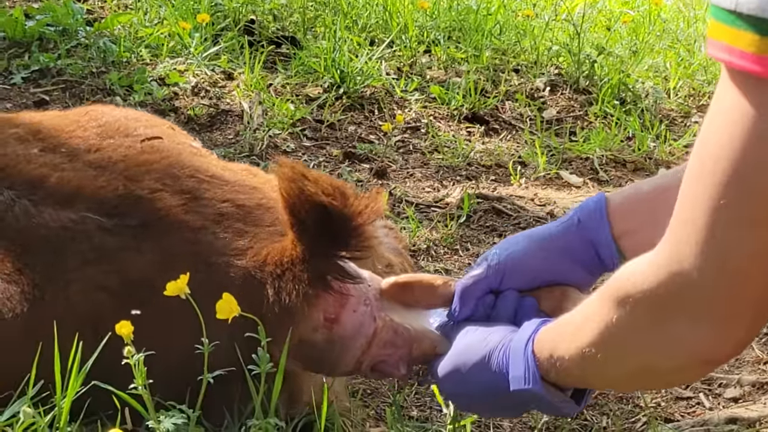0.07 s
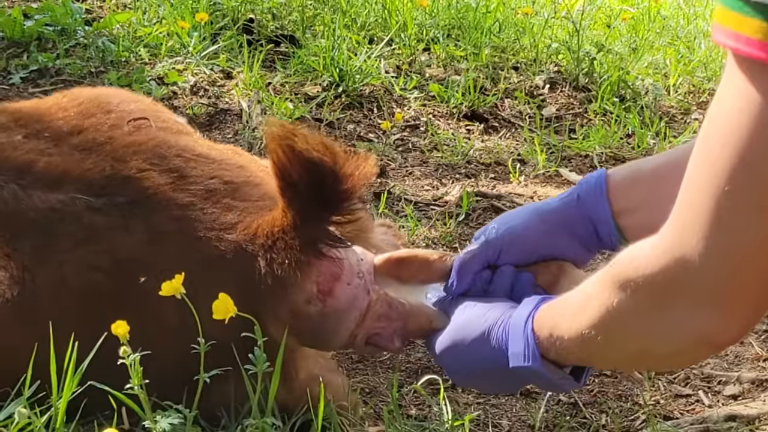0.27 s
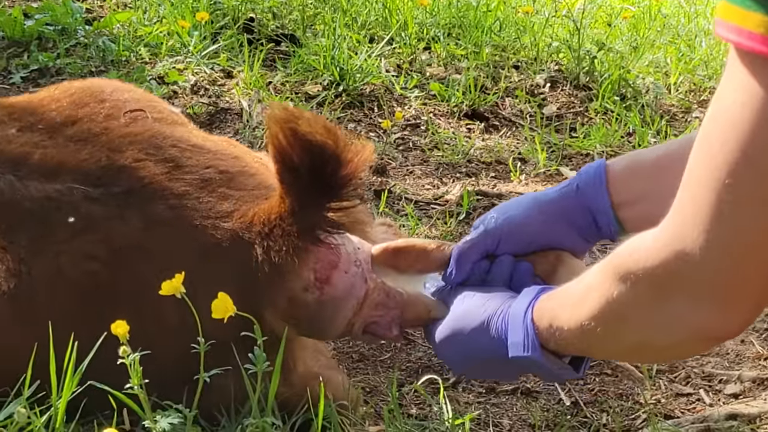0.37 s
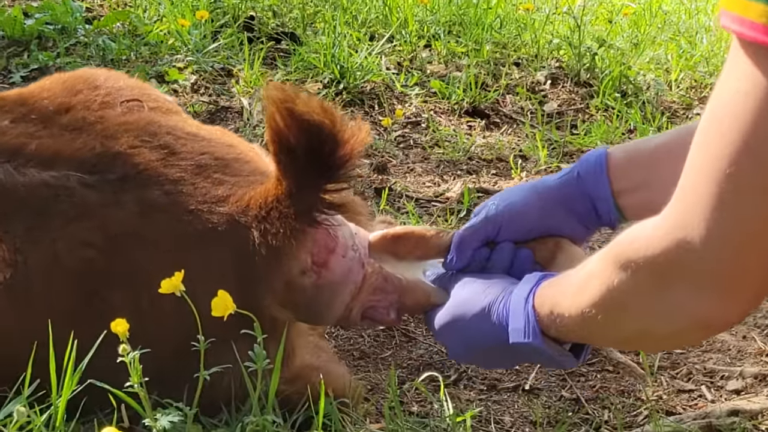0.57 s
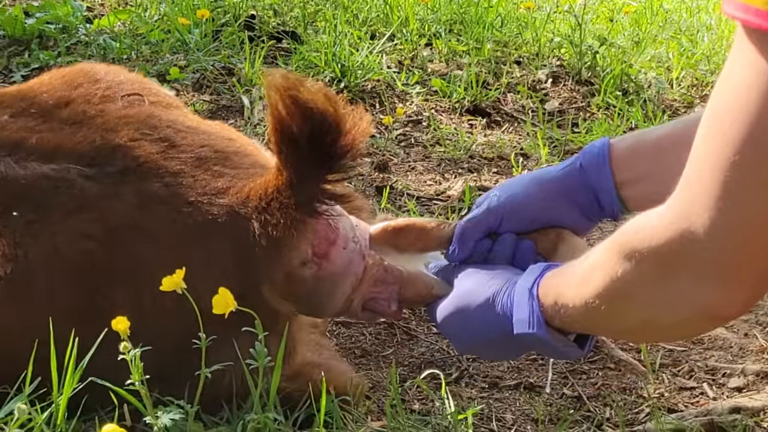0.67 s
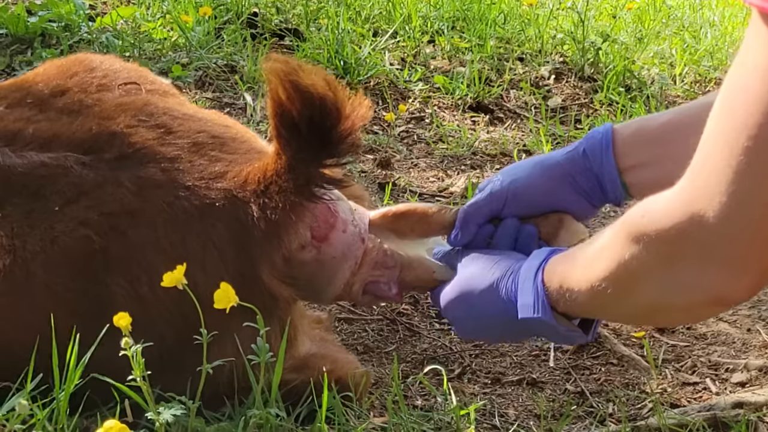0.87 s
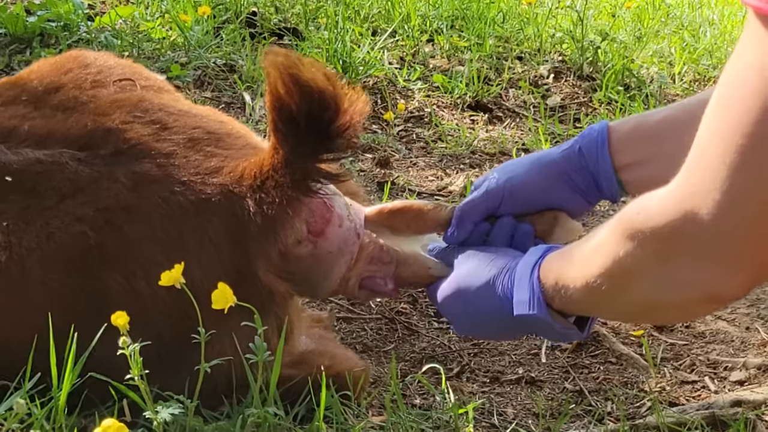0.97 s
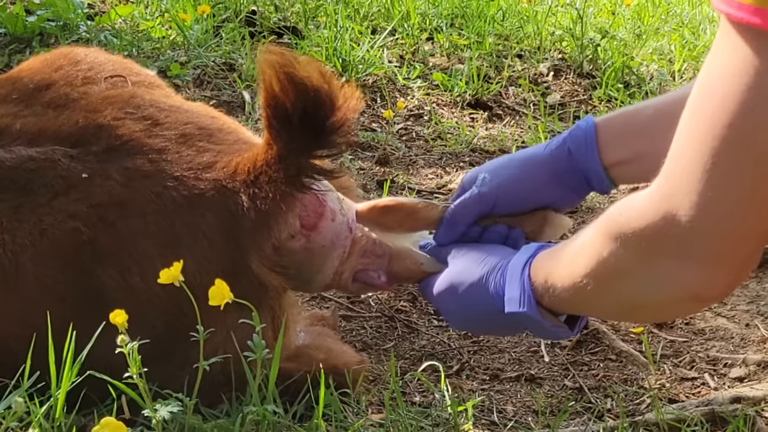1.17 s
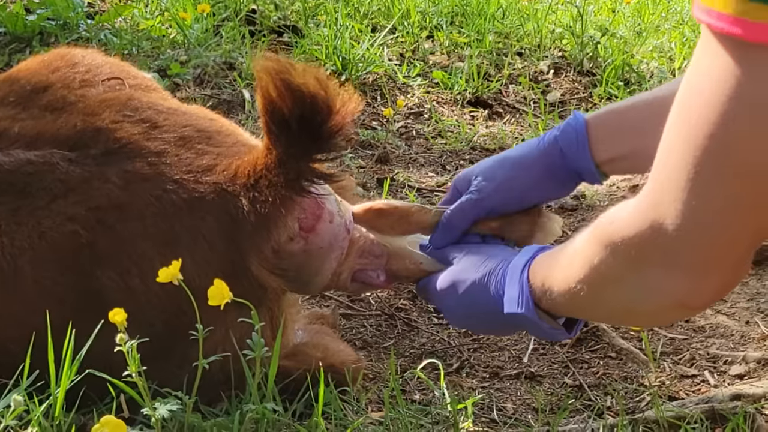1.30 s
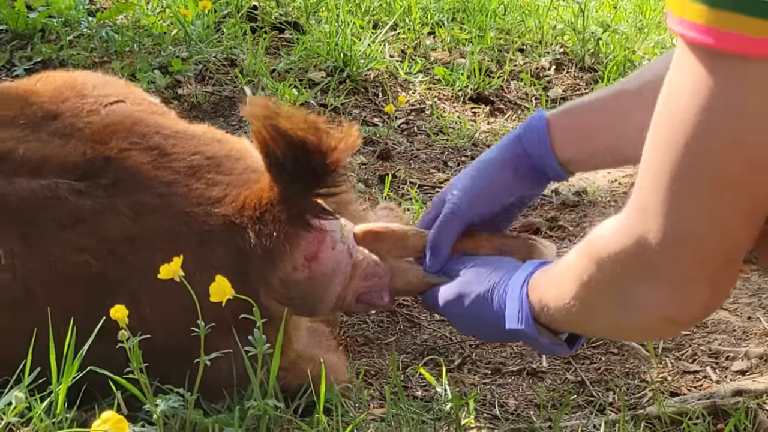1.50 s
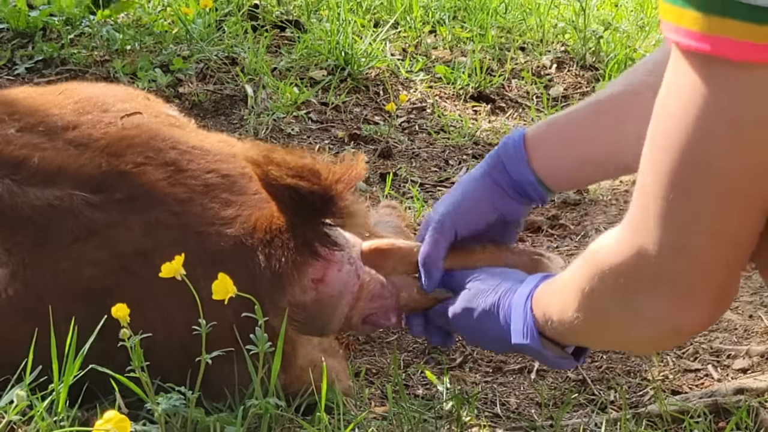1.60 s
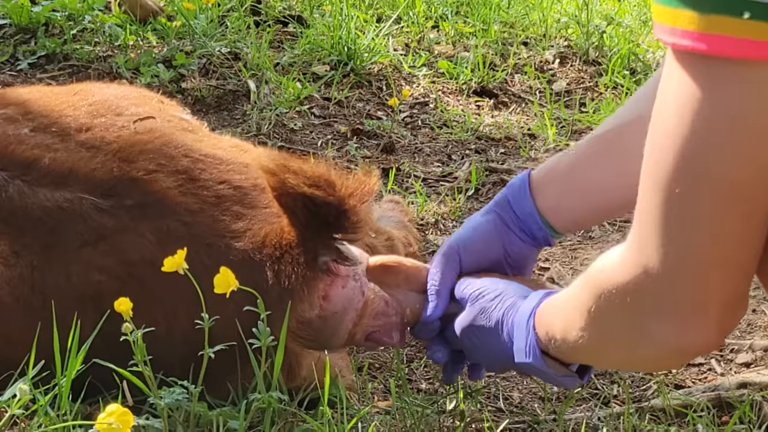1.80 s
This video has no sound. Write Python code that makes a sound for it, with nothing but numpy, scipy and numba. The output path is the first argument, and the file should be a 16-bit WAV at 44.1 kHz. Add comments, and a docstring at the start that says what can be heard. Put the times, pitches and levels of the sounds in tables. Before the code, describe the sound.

One loud, rasping goat bleat, heard outdoors, starts as a moan, rises to a high cry and breaks into a rough scream. A faint rustle and a few ticks of gloves follow against a quiet background.

```python
"""One long strained bleat from a goat in labour, lying on open ground.
A grunt and a low moan climb into a rasp, clear to a high cry, break into a harsh scream over a
lower growl, and sink to a groan. Each register is a train of vocal-fold pulses and breath, shaped
by the throat and a moving mouth. Gloved hands rustle faintly afterwards, over quiet outdoor air
with a far low hum."""
import sys
import numpy as np
from scipy.fft import rfft, irfft, next_fast_len
from scipy.io import wavfile
from scipy.ndimage import uniform_filter1d, minimum_filter1d
from numba import njit

SR = 44100
rng = np.random.default_rng(int(sys.argv[2]) if len(sys.argv) > 2 else 0)


def to_wav(s):
    """Save 16-bit WAV."""
    ch = np.atleast_2d(s).T  # columns
    pcm = np.round(np.clip(ch, -1, 1) * 32767)  # PCM
    wavfile.write(sys.argv[1], SR, pcm.astype(np.int16))


N = 81585
T = np.arange(N) / SR
SIZE = next_fast_len(N + SR // 2, True) // 2 * 2
HZ = np.maximum(np.arange(SIZE // 2 + 1) * SR / SIZE, 1)

# Vibrations of the vocal folds. Each row: time in seconds, rate in Hz.
PITCH = [(.13, 270.7), (.155, 289), (.187, 297.9), (.224, 335), (.25, 293.7), (.28, 291.9), (.298, 306.6),
         (.314, 351.3), (.34, 453), (.38, 449.5), (.41, 457), (.47, 439.6), (.508, 449.5), (.535, 439.3),
         (.585, 448.3), (.625, 454.4), (.672, 460.5), (.71, 490.5), (.74, 482.1), (.765, 412), (.84, 419.7),
         (.885, 443.8), (.94, 429.9), (1.0, 414.9), (1.08, 423.8), (1.18, 435.8)]  # the main voice
LOW_PITCH = [(.65, 228.3), (.72, 246.9), (.77, 262.9), (.86, 263.4), (.95, 249.6), (1.1, 244.8),
             (1.19, 244.9), (1.215, 242.3), (1.24, 229.8), (1.268, 230.9), (1.282, 341.5), (1.33, 343.2)]  # a second, lower vibration that takes over at the end
CREAK_PITCH = [(.06, 120.5), (.1, 125.7), (.14, 139.4), (.33, 150.3), (.38, 150.2), (.395, 118.1),
               (.47, 117.9), (.75, 133.9), (.88, 75.6), (1.0, 102.2), (1.18, 104.2)]  # the slow beat when they creak or scream


def from_db(db):
    """Decibels to gain."""
    return 10 ** (np.asarray(db) / 20)


def rms_one(x):
    """Scale to unit power."""
    return x / np.sqrt(np.mean(x ** 2) + 1e-20)


def in_time(rows):
    """A curve at every sample."""
    return np.interp(T, *np.transpose(rows))


def envelope(rows):
    """Gain of a level curve, silent outside it."""
    return from_db(np.interp(T, *np.transpose(rows), left=-120, right=-120))


def at_hz(points):
    """A spectrum table at every frequency."""
    hz, value = np.transpose(points)
    return np.interp(np.log(HZ), np.log(hz), value)


def filtered(x, response):
    """Apply a frequency response."""
    return irfft(rfft(x, SIZE) * response, SIZE)[..., :N]


def colour(x, points):
    """Causal (minimum-phase) EQ with the given curve."""
    cepstrum = irfft(np.log(from_db(at_hz(points))), SIZE)
    cepstrum[1:SIZE // 2] *= 2
    cepstrum[SIZE // 2 + 1:] = 0
    return filtered(x, np.exp(rfft(cepstrum)))


def drift(rate_hz):
    """Smooth random motion with a spread of 1."""
    return rms_one(filtered(rng.standard_normal(SIZE), 1 / (1 + (HZ / rate_hz) ** 2)))


def background():
    """A bed of quiet open air and a far, wavering hum, leaning slightly left."""
    air_eq = [(20, 0.5), (45, -4.5), (100, -0.5), (170, -9.5), (300, -17.5), (560, -21.5), (830, -13),
              (1100, -19), (1330, -14), (1700, -24.5), (2400, -27), (5500, -33), (8200, -44),
              (13000, -34.5), (16000, -37.5)]  # Each row: frequency in Hz, gain in dB.
    air_likeness = [(30, 0.4), (200, 1), (1000, 0.52), (3000, 0.0026), (8000, 0.078)]  # Each row: frequency in Hz, left-right correlation.
    air_db, hum_db, hum_hz, hum_width_hz = -50, -47.5, 59.3, 25
    left_right = np.array([[1], [-1]])
    mid, side = rng.standard_normal((2, SIZE))
    alike = at_hz(air_likeness)
    air = filtered(mid, np.sqrt(1 + alike)) + filtered(side, np.sqrt(1 - alike)) * left_right
    hum = filtered(rng.standard_normal(SIZE), 1 / (1 + (2 * (HZ - hum_hz) / hum_width_hz) ** 2))
    bed = from_db(air_db) * rms_one(colour(air, air_eq)) + from_db(hum_db) * rms_one(hum)
    return bed * from_db(.8 * left_right)


@njit
def moving_resonance(x, w, r):
    """A resonance of gain 1 and pole radius r whose centre w (radians a sample) moves."""
    y = np.zeros(len(x))
    for i in range(2, len(x)):
        drive = (1 - r * r) / 2 * (x[i] - x[i - 2])
        y[i] = drive + 2 * r * np.cos(w[i]) * y[i - 1] - r * r * y[i - 2]
    return y


def mouth(x):
    """The mouth's lowest resonance sweeps as it opens and closes."""
    centre = [(.1, 556), (.28, 667), (.35, 713), (.42, 958), (.7, 963), (.8, 903), (.89, 909), (1.0, 807),
              (1.07, 824), (1.17, 810), (1.195, 736), (1.222, 718.2), (1.245, 924), (1.28, 933)]  # Each row: time in seconds, resonance in Hz.
    width_hz, boost = 77.5, 4.8
    radius = np.exp(-np.pi * width_hz / SR)
    return x + boost * moving_resonance(x, 2 * np.pi * in_time(centre) / SR, radius)


def register(pitch, level, throat, jitter, wander_hz, shimmer_db, breath,
             beat_db=0, swing_cycles=0, beat_wander=.022, even_s=.049):
    """Uneven fold pulses, swayed by a slow beat, pass with puffs of air through throat and mouth."""
    beat = 2 * np.pi * np.cumsum(in_time(CREAK_PITCH) * (1 + beat_wander * drift(50))) / SR
    fold_hz = in_time(pitch) * (1 + jitter * drift(wander_hz))
    phase = np.cumsum(fold_hz) / SR + swing_cycles * np.sin(beat)
    cycle = np.arange(1, int(phase[-1]))
    onsets = np.interp(cycle, np.maximum.accumulate(phase), np.arange(N))
    strength = from_db(shimmer_db * rng.standard_normal(N)[cycle]
                       + beat_db * np.cos(beat[onsets.astype(int)]))
    # A windowed sinc places each pulse between samples.
    taps = onsets.astype(int)[:, None] + np.arange(-8, 9)
    offset = taps - onsets[:, None]
    pulses = np.zeros(N)
    np.add.at(pulses, np.clip(taps, 0, N - 1), strength[:, None] * np.sinc(offset) * np.sinc(offset / 9))
    puffs = rng.standard_normal(N) * (1 + np.cos(2 * np.pi * phase)) ** 2
    voice = mouth(colour(rms_one(pulses) + breath * rms_one(puffs), throat))
    # Even out the power so that the level curve sets the loudness.
    span = int(even_s * SR)
    power = uniform_filter1d(uniform_filter1d(voice ** 2, span), span)
    return envelope(level) * voice / np.sqrt(np.abs(power) + 1e-12)


def grunt():
    """The folds creak slowly in a breathy opening grunt."""
    level = [(.04, -71), (0.073, -39), (.11, -38), (.14, -34.5), (.16, -45), (.2, -46.5)]  # Each row: time in seconds, level in dB.
    throat = [(80, -24.5), (130, 5), (250, 6.5), (380, 1), (500, -26.5), (700, 2), (1000, -34), (1400, 5),
              (2200, -32.5), (2900, -12.5), (4100, -9.5), (4700, -9), (5300, -5.5), (6500, -29.5),
              (8000, -67.5)]  # Each row: frequency in Hz, gain in dB.
    return register(CREAK_PITCH, level, throat, jitter=.027, wander_hz=79, shimmer_db=2, breath=.5)


def throat_hiss():
    """Turbulent air flutters through the throat under the whole bleat."""
    level = [(.04, -78), (.08, -61), (.13, -56), (.18, -49), (.28, -47), (.35, -43), (.46, -43), (.5, -45),
             (.66, -38), (.75, -37), (1.1, -38.5), (1.2, -35), (1.27, -40), (1.35, -54.5)]  # Each row: time in seconds, level in dB.
    throat = [(200, -14), (900, -7.5), (1400, -1.5), (2200, 3), (3000, -11), (4200, -3), (4800, -7),
              (5500, -3.5), (6500, -25.5), (8200, -43.5), (10000, -26), (14000, -17.5), (16000, -34.5)]  # Each row: frequency in Hz, gain in dB.
    hiss = colour(rng.standard_normal((2, N)), throat)
    flutter = from_db(2 * drift(120))
    return envelope(level) * rms_one(hiss * flutter)


def moan():
    """Steady pulses with little breath make a low moan."""
    level = [(0.114, -73), (.15, -37), (.19, -33), (0.223, -23.5), (.25, -33), (0.301, -26.5), (0.318, -31),
             (0.343, -69.5)]  # Each row: time in seconds, level in dB.
    throat = [(100, -47), (300, 1), (620, -6.5), (920, -1.5), (1250, -4.5), (1650, 11), (2000, -9),
              (2350, -22), (2950, -5.5), (3600, -22), (4500, -16), (5400, -36.5), (6200, -31), (8000, -66)]  # Each row: frequency in Hz, gain in dB.
    return register(PITCH, level, throat, jitter=.0024, wander_hz=78.6, shimmer_db=1, breath=.06)


def rasp():
    """The slow beat roughens the pulses as the pitch climbs."""
    level = [(.29, -47), (0.318, -22.5), (.36, -19.5), (.385, -19), (.4, -16.5), (0.467, -17),
             (0.478, -33.5), (.5, -48.5)]  # Each row: time in seconds, level in dB.
    throat = [(100, -27.5), (300, -19), (470, -25.5), (750, -10.5), (950, -15), (1070, -23.5), (1250, 0),
              (1550, -11.5), (1800, 4.5), (2350, -21), (3000, -14.5), (4200, -21.5), (4800, -31),
              (6000, -32), (8000, -76)]  # Each row: frequency in Hz, gain in dB.
    return register(PITCH, level, throat, jitter=.009, wander_hz=120, shimmer_db=3.7, breath=.35,
                    beat_db=3.5, swing_cycles=.096, even_s=.0063)


def cry():
    """Almost even pulses ring out as a clear, high cry."""
    level = [(0.449, -56.5), (0.476, -16), (0.552, -16.5), (0.602, -16.5), (.68, -12.5), (0.698, -20.5),
             (.722, -11.5), (.755, -30), (0.781, -73.5)]  # Each row: time in seconds, level in dB.
    throat = [(100, -55), (450, -23), (900, -12), (1350, -2.5), (1800, 0.5), (2250, -7.5), (2700, -18),
              (3150, -5), (3600, -11.5), (4100, -20), (4700, -28.5), (5500, -23), (6300, -34),
              (8000, -60.5), (12000, -49.5), (16000, -69.5)]  # Each row: frequency in Hz, gain in dB.
    return register(PITCH, level, throat, jitter=.0039, wander_hz=60, shimmer_db=.06, breath=.02)


def fundamental():
    """The soft, nearly pure bottom of the lower vibration."""
    level = [(.635, -87.5), (.66, -40), (.7, -52), (.77, -36.5), (.85, -71.5), (1.15, -57), (1.2, -41),
             (1.28, -40.5), (1.31, -53.5)]  # Each row: time in seconds, level in dB.
    phase = np.cumsum(in_time(LOW_PITCH) * (1 + .0487 * drift(40))) / SR
    return envelope(level) * rms_one(np.sin(2 * np.pi * phase))


def growl():
    """The lower vibration runs under the scream and ends as a groan."""
    level = [(.66, -52), (.7, -41.5), (.735, -17), (.8, -19), (0.899, -23.5), (1.17, -24), (1.19, -22),
             (1.225, -21.5), (1.26, -15.5), (1.277, -25.5), (1.301, -29.5), (1.32, -42.5), (1.34, -68)]  # Each row: time in seconds, level in dB.
    throat = [(100, -45.5), (235, -21), (470, -11.5), (710, -7.5), (940, -1), (1180, -17), (1750, 8.5),
              (2400, -16), (3100, -6.5), (4200, -12), (4900, -33.5), (5600, -22), (6300, -36.5),
              (8000, -77.5)]  # Each row: frequency in Hz, gain in dB.
    return register(LOW_PITCH, level, throat, jitter=.0055, wander_hz=80.4, shimmer_db=.74, breath=.033)


def scream():
    """The folds break into harsh, erratic pulses with an unsteady beat."""
    level = [(0.681, -57.5), (0.734, -29), (.78, -15.5), (0.866, -16.5), (.89, -8), (0.938, -16.5),
             (0.984, -13.5), (1.0, -14.5), (1.067, -13.5), (1.177, -19.5), (1.191, -43), (1.264, -34),
             (1.279, -27.5), (1.305, -44), (1.341, -47.5), (1.39, -65.5), (1.412, -46), (1.442, -75)]  # Each row: time in seconds, level in dB.
    throat = [(100, -55), (250, -10), (420, -27.5), (600, -15), (740, -8.5), (880, -11.5), (1130, -17.5),
              (1300, -7.5), (1480, -22), (1700, 3), (2000, -10.5), (2400, -24), (3150, -17.5), (4200, -25),
              (4800, -44.5), (5550, -24), (6300, -42), (7200, -74.5)]  # Each row: frequency in Hz, gain in dB.
    return register(PITCH, level, throat, jitter=.048, wander_hz=134.1, shimmer_db=5, breath=.3,
                    beat_db=4.5, swing_cycles=.03, beat_wander=.22, even_s=.014)


def outdoors(voice):
    """The voice reaches two microphones from the left; ground and surroundings scatter a short tail."""
    right_lag = [(60, -0.4), (400, 1), (900, 0.7845), (1400, 1.85), (1800, 2.5), (2250, 1.9), (2600, 5),
                 (3100, 3), (4000, 3.5), (4500, 9), (5300, 4), (6200, 11.5), (15000, 7)]  # Each row: frequency in Hz, phase lag in radians.
    balance = [(100, 2.3), (900, 1), (1600, 2.5), (2200, 0), (3000, 0.5), (3700, -11), (5500, -11.5),
               (6500, 15.5), (12000, 6.5)]  # Each row: frequency in Hz, left over right in dB.
    scatter = [(200, -30.5), (900, -20), (1800, -16.5), (3000, -2), (4200, 0), (8000, 7)]  # Each row: frequency in Hz, tail over direct sound in dB.
    t60_s, predelay_s = .13, .003
    lean, lag = from_db(at_hz(balance) / 2), np.exp(-1j * at_hz(right_lag))
    direct = filtered(voice, np.array([lean, lag / lean]))
    tail = rng.standard_normal((2, N)) * from_db(-60 * T / t60_s) * (T > predelay_s)
    tail /= np.sqrt(np.sum(tail ** 2, axis=1, keepdims=True))
    wet = from_db(at_hz(scatter))
    scattered = filtered(voice, rfft(tail, SIZE) * wet)
    return filtered(direct + scattered, 1 / np.sqrt(1 + wet ** 2))


def gloves():
    """Gloves and straw give a grainy rustle and a few sharp ticks of bright noise."""
    touches = [(1.5096, -44), (1.566, -43), (1.5869, -60), (1.616, -34.5), (1.6729, -36.5), (1.8027, -41.5)]  # Each row: start in seconds, level in dB before the trim.
    rustle_level = [(0, -90), (.06, -86), (1.48, -83.5), (1.52, -60.5), (1.69, -68), (1.72, -85),
                    (1.85, -83)]  # Each row: time in seconds, level in dB.
    bright_eq = [(500, -17), (3000, -10.5), (5500, 1), (8500, -10), (13000, 4.5), (16000, -8.5)]  # Each row: frequency in Hz, gain in dB.
    decay_s, trim_db, grain_db = .0013, -7.5, 4
    ticks = sum(from_db(db + trim_db) * (T >= start) * np.exp(-np.abs(T - start) / decay_s)
                for start, db in touches)
    rustle = envelope(rustle_level) * rms_one(from_db(grain_db * drift(150)))
    return (ticks + rustle) * rms_one(colour(rng.standard_normal((2, N)), bright_eq))


def scene():
    """The registers overlap into one bleat, joined by breath, hands and open air."""
    bleat = grunt() + moan() + rasp() + cry() + scream() + growl() + fundamental()
    return outdoors(bleat) + throat_hiss() + gloves() + background()


def record(dry):
    """A quick limiter holds the peaks; the top is cut steeply."""
    ceiling, limiter_s, cutoff_hz = .8, .004, 15800
    span = int(limiter_s * SR)
    gain = np.minimum(1, ceiling / (np.abs(dry).max(axis=0) + 1e-9))
    gain = uniform_filter1d(minimum_filter1d(gain, 2 * span + 1), span)
    return filtered(dry * gain, 1 / (1 + (HZ / cutoff_hz) ** 200))


dry = scene()
out = record(dry)
to_wav(out)
```